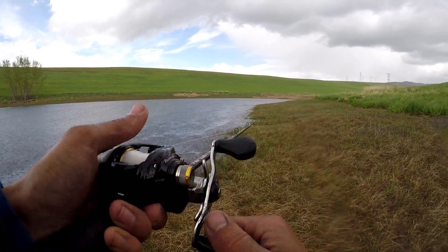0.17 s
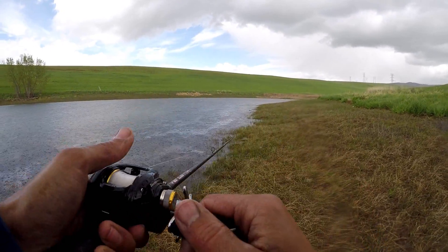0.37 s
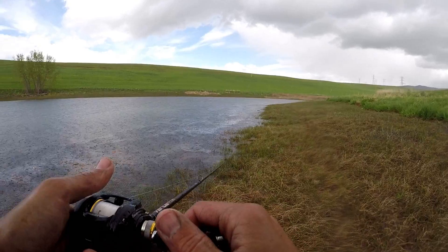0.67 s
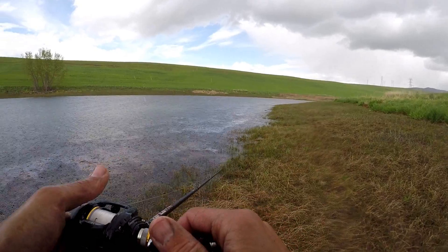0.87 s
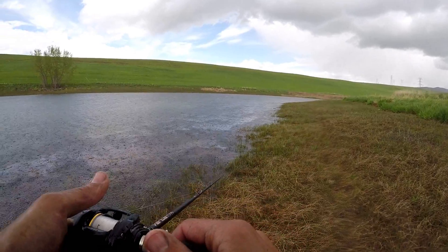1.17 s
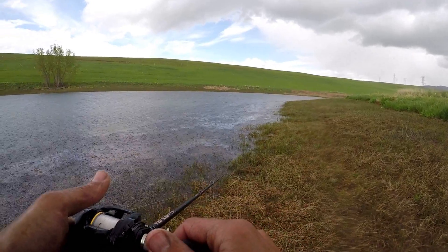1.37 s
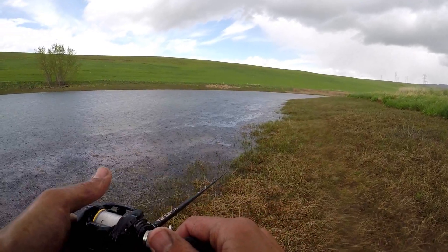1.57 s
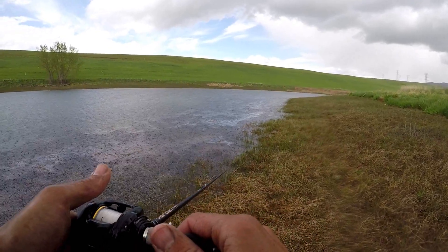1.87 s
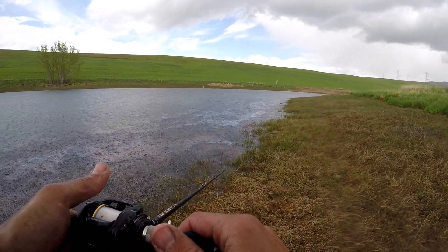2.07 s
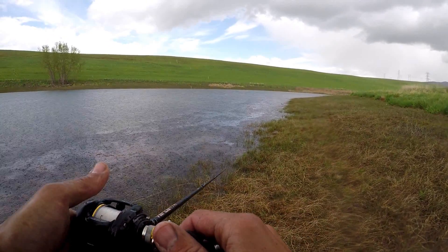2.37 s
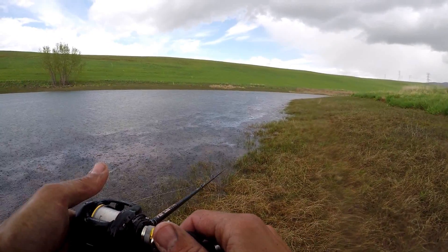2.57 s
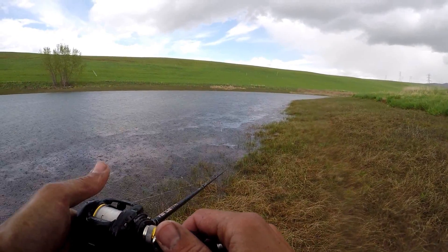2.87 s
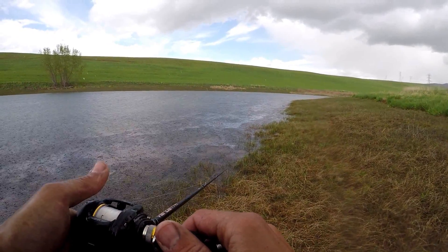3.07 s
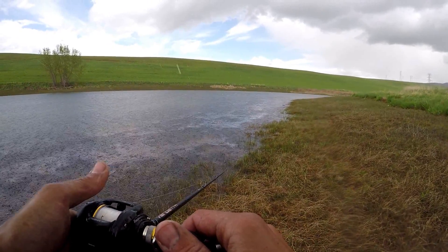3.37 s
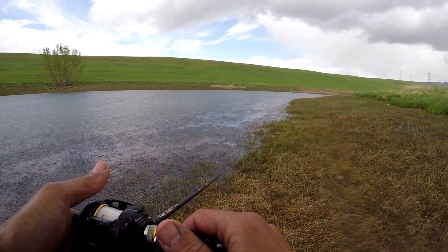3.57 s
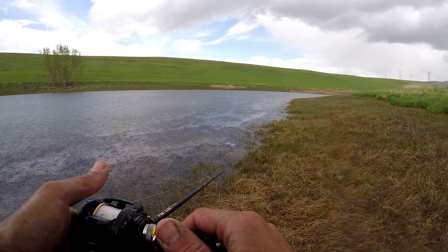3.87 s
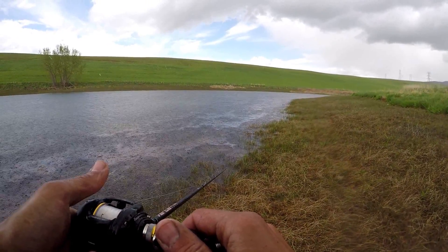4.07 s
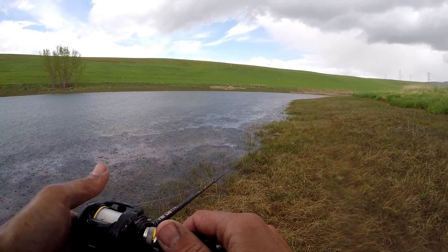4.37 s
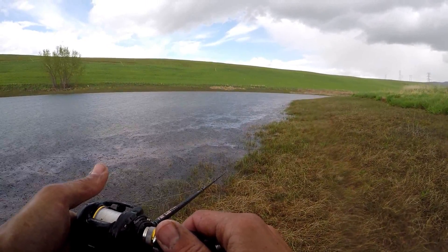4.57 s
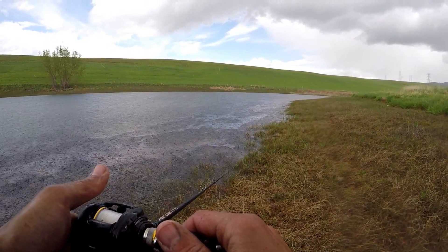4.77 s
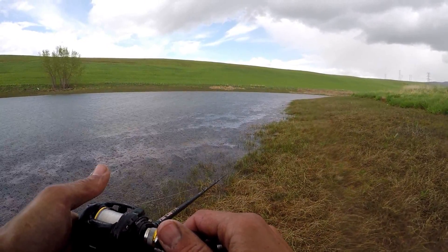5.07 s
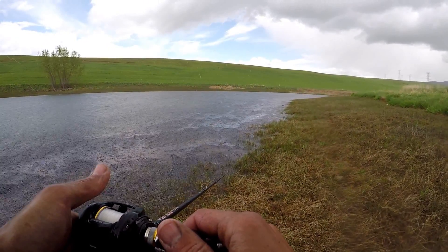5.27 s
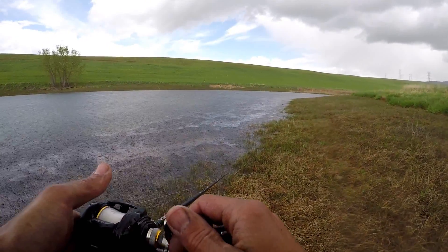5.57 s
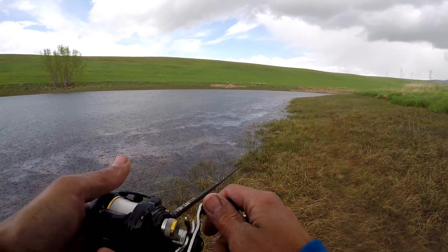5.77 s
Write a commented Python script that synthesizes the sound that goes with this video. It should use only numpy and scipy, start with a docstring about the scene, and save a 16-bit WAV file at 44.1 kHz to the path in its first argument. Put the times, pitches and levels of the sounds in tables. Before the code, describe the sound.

Heavy raindrops pop and patter on a rain jacket beside a pond, with soft rain hiss and low wind rumble thumping the microphone.

```python
"""Heavy rain on a rain jacket

We listen from the chest of an angler in a rain jacket, on the grassy bank of a pond.
Fat and small drops pop on the taut cloth: a short push bends a damped fold and sets off ripples.
A few drops tick on the hard microphone case, and others spatter on grass stalks, as short ringing hits.
Far rain is a hiss of coloured noise; wind is low noise that swells and fades, with dull rounded thumps."""
import sys
import numpy as np
from scipy import signal
from scipy.fft import rfft, irfft
from scipy.io import wavfile
from scipy.ndimage import uniform_filter1d

SR = 44100
rng = np.random.default_rng(int(sys.argv[2]) if len(sys.argv) > 2 else 0)


def output_pcm(signal):
    """Save a mono or channel-first signal as 16-bit PCM at the path in sys.argv[1].

    Samples are clipped to [-1, 1] before scaling.
    """
    pcm = np.clip(np.atleast_2d(signal).T, -1, 1) * 32767
    wavfile.write(sys.argv[1], SR, np.round(pcm).astype(np.int16))


N = 261072
GRAIN = 1024  # samples that one drop lasts


def from_db(db):
    """Turn decibels into a factor to multiply the sound by."""
    return 10 ** (np.asarray(db) / 20)


def rms_one(x):
    """Scale every row to an average strength (rms) of 1."""
    return x / np.sqrt(np.mean(x ** 2, axis=-1, keepdims=True) + 1e-20)


def in_time(rows):
    """Draw straight lines between the rows of a table, giving each column a value at every sample."""
    times, *columns = np.transpose(rows)
    return [np.interp(np.arange(N) / SR, times, column) for column in columns]


def noise(spectrum):
    """Steady noise of a given colour, rms 1, silent outside the frequencies in the table."""
    hz, db = np.transpose(spectrum)
    f = np.maximum(np.fft.rfftfreq(N, 1 / SR), 1e-3)
    gain = from_db(np.interp(np.log(f), np.log(hz), db, left=-np.inf, right=-np.inf))
    white = rfft(rng.standard_normal(N))
    return rms_one(irfft(white * gain, N))


def response(hz, q):
    """Low-pass and band-pass response of a damped mass on a spring; a higher q rings longer."""
    s = 1j * np.fft.rfftfreq(GRAIN, 1 / SR) / hz
    low = 1 / (1 + s / q + s * s)
    band = low * s / q
    return low, band


def splatter(count, decay_s):
    """Spectra of short bursts of noise that die away, each of unit energy."""
    fade = np.exp(-np.arange(GRAIN) / SR / decay_s)
    bursts = rng.standard_normal((count, GRAIN)) * fade
    return rfft(rms_one(bursts)) / np.sqrt(GRAIN)


def place(times, grains):
    """Add every grain to the timeline at its own time."""
    at = np.round(times * SR).astype(int) + np.arange(GRAIN)
    return np.bincount(at.ravel(), grains.ravel(), N)[:N]


def cloth_pops(fold_hz, contact_hz, fold_q, ripple, flap, ripple_s=0.0012, ripple_hz=2300,
               flap_hz=290, spray=0.0033):
    """One pop per drop: a brief push bends a heavily damped fold, then ripples run through the cloth."""
    count = len(fold_hz)
    # each spot of cloth differs
    tension, looseness, panel_size = rng.standard_normal((count, 3)).T[:, :, None]
    push = response(contact_hz, np.sqrt(.5))[0]  # a softer contact is duller

    ripples = splatter(count, ripple_s) * response(ripple_hz, 0.73)[0]
    ripples = ripples * np.sqrt(SR / 4 / ripple_hz)  # make up for the treble filtered out
    ripple_amount = ripple * from_db(8.8 * looseness)
    fold = response(fold_hz, fold_q * from_db(0.4 * tension))[1]
    fold = fold * (1 + ripple_amount * ripples)

    # the whole panel swings low
    panel = flap * response(flap_hz * 2 ** (0.54 * panel_size), 1.36)[1]
    # the bursting drop adds a trace of treble
    droplets = spray * splatter(count, 0.0048)

    # bending waves travel faster the higher they are, so the lows arrive a little late
    s = 1j * np.fft.rfftfreq(GRAIN, 1 / SR) / contact_hz
    late_lows = (1 - s) / (1 + s)
    return rms_one(irfft(push * (fold + panel) * late_lows + droplets))


# The fattest drops on the jacket, levels averaged over one grain, before the colour of the case:
# (time [s], level [dB], pitch of the struck fold [Hz], sharpness of the contact [Hz])
FAT_DROPS = [(0.094, -34, 1080, 1870), (0.241, -41, 2180, 5560), (0.2519, -34.5, 870, 1530),
             (0.2725, -31.5, 920, 2440), (0.414, -40.5, 3040, 3200), (0.432, -27.5, 960, 1500),
             (0.4499, -37, 950, 1200), (0.4592, -33, 754, 1600), (0.4692, -38.5, 784, 1780),
             (0.585, -32.5, 1060, 1610), (0.716, -31.5, 780, 2100), (0.755, -33, 1400, 3300),
             (0.9678, -34, 1670, 1590), (0.9883, -28.5, 1300, 2740), (1.0543, -30.5, 700, 1810),
             (1.1276, -35, 705, 2840), (1.1677, -32, 1700, 2050), (1.2824, -28, 800, 1330),
             (1.2977, -31, 920, 2680), (1.3079, -36, 2100, 2110), (1.3381, -30, 1140, 1230),
             (1.3944, -35.5, 740, 2600), (1.5374, -34.5, 1360, 2100), (1.5949, -33.5, 1010, 2400),
             (1.6234, -29, 1160, 2160), (1.685, -30, 1800, 2430), (1.691, -31.5, 1080, 2910),
             (1.7354, -35.5, 2620, 2600), (1.8037, -32, 940, 1830), (1.835, -30.5, 700, 2580),
             (1.9067, -27.5, 1210, 3530), (2.0456, -35.5, 1390, 4200), (2.0629, -24.5, 1240, 1360),
             (2.0696, -39.5, 1800, 6000), (2.1382, -33.5, 1330, 2440), (2.2414, -29.5, 940, 4170),
             (2.2499, -30.5, 1060, 2920), (2.314, -32.5, 1190, 1770), (2.3639, -31, 1920, 1830),
             (2.4054, -33.5, 790, 1610), (2.417, -33.5, 2010, 3060), (2.5118, -35.5, 1030, 2410),
             (2.5648, -31.5, 790, 2720), (2.598, -29, 1510, 3480), (2.6921, -33, 1630, 2490),
             (2.795, -35, 1410, 2600), (2.8435, -32, 1040, 2360), (2.9167, -34.5, 730, 2900),
             (2.954, -34.5, 785, 3500), (2.9903, -32, 770, 1190), (3.0448, -32, 950, 3100),
             (3.0862, -27, 756, 3800), (3.126, -32, 726, 1800), (3.2295, -31, 890, 3800),
             (3.2422, -31.5, 990, 9000), (3.266, -32, 597, 2400), (3.2925, -31.5, 980, 8000),
             (3.3621, -35, 990, 2400), (3.3815, -33.5, 1010, 2400), (3.399, -27.5, 1560, 1700),
             (3.4363, -33, 950, 3500), (3.4707, -36, 1080, 2100), (3.5219, -30.5, 905, 7100),
             (3.5427, -28.5, 1580, 1800), (3.5609, -30.5, 684, 2030), (3.572, -27, 647, 3100),
             (3.596, -37.5, 2100, 7200), (3.6411, -32.5, 730, 3500), (3.662, -37, 1460, 2900),
             (3.8505, -30, 2080, 1970), (3.8548, -32.5, 1070, 2600), (3.8637, -33.5, 1310, 2600),
             (3.9278, -33.5, 483, 2900), (3.9304, -32.5, 1900, 1800), (3.9744, -31.5, 810, 2880),
             (3.9877, -27.5, 1160, 2860), (4.036, -32.5, 1360, 3500), (4.0785, -30, 1380, 1500),
             (4.1493, -28.5, 1700, 1600), (4.189, -32, 2200, 2100), (4.203, -33, 1390, 2000),
             (4.2377, -24.5, 880, 3100), (4.271, -35.5, 784, 2400), (4.3468, -34, 2540, 2400),
             (4.377, -25.5, 754, 3000), (4.5092, -31, 1410, 8450), (4.7189, -37, 750, 5600),
             (4.8205, -30, 710, 1800), (4.8549, -34, 660, 1700), (4.8969, -28.5, 1210, 2900),
             (4.9187, -34, 1010, 5100), (4.9785, -32.5, 990, 2000), (4.994, -34, 900, 3820),
             (5.062, -34.5, 840, 2100), (5.2059, -34, 1140, 1290), (5.2627, -30, 1660, 1500),
             (5.3158, -31.5, 1720, 1700), (5.3274, -27.5, 770, 2000), (5.339, -30.5, 1160, 1830),
             (5.3509, -33.5, 540, 3500), (5.4716, -34.5, 680, 1780), (5.4798, -36.5, 1010, 5100),
             (5.6634, -30, 736, 2580), (5.68, -27.5, 800, 2580), (5.6936, -34, 950, 2580),
             (5.7014, -30, 900, 1590), (5.763, -31.5, 1250, 2620), (5.8068, -33, 910, 1970),
             (5.8592, -28, 1070, 1680)]


def fat_drops():
    """The loudest single pops, each bending its own fold of cloth at a listed time."""
    times, db, fold_hz, contact_hz = np.array(FAT_DROPS, float).T[:, :, None]
    pops = cloth_pops(fold_hz, contact_hz, fold_q=1.1, ripple=0.38, flap=0.28)
    return place(times, from_db(db) * pops)


def small_drops(patter_db, count=1700, top_db=2.0, range_db=17.0, fold_hz=1130, contact_hz=2600):
    """Smaller drops pop at random all over the jacket, the faint ones most often."""
    times = rng.uniform(0, (N - 1) / SR, (count, 1))
    fainter_db = range_db * rng.random((count, 1)) ** 0.69
    db = patter_db[(times * SR).astype(int)] + top_db - fainter_db
    # spread the pitches in octaves
    folds = fold_hz * 2 ** rng.normal(0, 0.5, (count, 1))
    contacts = contact_hz * 2 ** rng.normal(0, 0.44, (count, 1))
    pops = cloth_pops(folds, contacts, fold_q=2.02, ripple=0.42, flap=0.24)
    return place(times, from_db(db) * pops)


# The sharpest drops on the microphone case, peak levels relative to one another:
# (time [s], level [dB])
CASE_TICKS = [(1.607, -24.5), (1.7384, -25), (1.8357, -25), (2.422, -21.5), (2.694, -30), (2.922, -27),
              (3.0476, -27), (3.086, -24), (3.123, -23.5), (3.153, -24.5), (3.3685, -29.5), (3.389, -24),
              (3.429, -29), (3.631, -23), (3.9755, -26), (4.0532, -19.5), (4.0683, -22.5), (4.2865, -33),
              (4.301, -20.5), (4.356, -30), (4.376, -27), (4.92, -29), (4.9936, -32), (5.43, -31),
              (5.6644, -31), (5.8388, -27)]


def case_ticks(gain_db=4.5, case_hz=2400, case_q=0.87, splash=1.0, splash_s=0.00037, crack=0.042):
    """Hard plastic gives a very short, bright tick with a little splash."""
    times, db = np.array(CASE_TICKS, float).T[:, :, None]
    hit = 1 + splash * splatter(len(times), splash_s)
    body = response(case_hz, case_q)[1]
    bright_edge = crack * response(10000, 3.6)[1]
    ticks = irfft(hit * (body + bright_edge))
    ticks = ticks / np.abs(ticks).max(axis=1, keepdims=True)
    return place(times, from_db(db + gain_db) * ticks)


# How the hollow case colours all near drops, one row per resonance:
# (centre [Hz], width [Hz], lift or cut [dB])
CASE_RESONANCES = [(252, 60, 2), (810, 250, 2), (1400, 1470, -2), (1980, 500, 1.5), (3450, 3500, -1)]


def case_colour(x):
    """Each resonance of the hollow case lifts or lowers its own band."""
    for hz, width_hz, db in CASE_RESONANCES:
        b, a = signal.iirpeak(hz, hz / width_hz, fs=SR)
        x = x + (from_db(db) - 1) * signal.lfilter(b, a, x)
    return x


def grass_ticks(patter_db, count=500, top_db=-4.5, range_db=39.5, blade_hz=3900, blade_q=2.6, wet=0.88):
    """Drops on the stalks underfoot give a thin, crisp spatter: high, damped rings with a wet burst."""
    times = rng.uniform(0, (N - 1) / SR, (count, 1))
    fainter_db = range_db * rng.random((count, 1)) ** .5
    db = patter_db[(times * SR).astype(int)] + top_db - fainter_db
    blades = blade_hz * 2 ** rng.normal(0, 0.4, (count, 1))
    ring = response(blades, blade_q)[1]
    softened = ring * response(9900, np.sqrt(.5))[0]
    ticks = softened * (1 + wet * splatter(count, 0.0015))
    return place(times, from_db(db) * rms_one(irfft(ticks)))


# Colour of the far rain, only the shape matters:
# (frequency [Hz], relative level [dB per Hz])
POND_COLOUR = [(100, 17.5), (200, 4), (400, 7.5), (800, 2.5), (1800, -3), (3000, -8.5), (5000, -12.5),
               (7300, -12), (9500, -21), (14500, -21), (16000, -29)]


def pond(hiss_db, gain_db=10.5):
    """Countless far drops on water and grass merge into a smooth wash of noise."""
    return from_db(hiss_db + gain_db) * noise(POND_COLOUR)


def eddies(spectrum, steady_s):
    """Turbulent pressure whose strength is evened out over steady_s, so that the gusts set its level."""
    x = noise(spectrum)
    power = uniform_filter1d(x * x, max(int(steady_s * SR), 1))
    return x / np.sqrt(power + 0.13)  # 0.13 keeps quiet moments from being raised too far


# Strength of the wind on the microphone, before the gains in wind():
# (time [s], slow sway level [dB], buffeting level [dB])
WIND_LEVELS = [(0.0, -32, -50), (0.55, -31, -52), (1.04, -24.5, -36), (1.25, -26, -43), (1.65, -20, -37.5),
               (1.95, -22.5, -38.5), (2.39, -15.5, -32.5), (2.56, -20, -39.5), (3.15, -21.5, -37),
               (3.5, -17.5, -35), (3.92, -24.5, -43), (4.24, -21.5, -38), (4.71, -16, -35.5),
               (4.9, -23, -36.5), (5.17, -16.5, -35), (5.42, -22, -37.5), (5.6, -16.5, -35.5),
               (5.92, -24.5, -50)]
# Colour of the slow sway, only the shape matters: (frequency [Hz], relative level [dB per Hz])
SWAY_COLOUR = [(2, 1.5), (5, 5.5), (10, 3), (18, -2.5), (30, -13.5), (42, -14), (70, -39)]
# Colour of the buffeting, only the shape matters: (frequency [Hz], relative level [dB per Hz])
BUFFET_COLOUR = [(25, -2), (45, -7.5), (65, -3), (95, -7.5), (140, -16), (220, -19.5), (450, -41.5)]


def wind(sway_gain_db=5.5, buffet_gain_db=-1.0):
    """Large eddies sway the pressure slowly; small ones buffet the microphone port in gusts."""
    sway_db, buffet_db = in_time(WIND_LEVELS)
    sway = from_db(sway_db + sway_gain_db) * eddies(SWAY_COLOUR, 0.23)
    buffeting = from_db(buffet_db + buffet_gain_db) * eddies(BUFFET_COLOUR, 0.061)
    return sway + buffeting


# Dull bumps as gusts and cloth knock the microphone:
# (time [s], peak level [dB], pitch [Hz])
BUMPS = [(0.381, -23.5, 43.5), (0.585, -24, 209), (0.65, -24, 54), (0.887, -27.5, 111), (1.07, -27, 60),
         (1.259, -26, 102), (1.626, -31.5, 207), (2.163, -21.5, 63.7), (2.277, -19.5, 62),
         (2.332, -19.5, 80), (2.388, -18, 71.4), (3.063, -23, 61), (3.375, -24.5, 229), (3.408, -23, 95),
         (4.036, -24.5, 247), (4.727, -23.5, 69), (5.161, -14.5, 61.6), (5.259, -13.5, 68.4),
         (5.527, -18.5, 48), (5.663, -22.5, 268), (5.696, -20.5, 55)]


def thumps(q=1.46, top_ratio=1.32):
    """Each bump is a soft, rounded push on the case that swings and quickly dies away."""
    out = np.zeros(N)
    size = SR // 8  # samples that one bump lasts
    for time, db, hz in BUMPS:
        rounding = signal.butter(3, top_ratio * hz, fs=SR, output="sos")
        push = signal.sosfilt(rounding, signal.unit_impulse(size))
        b, a = signal.iirpeak(hz, q, fs=SR)
        bump = signal.lfilter(b, a, push)
        bump = from_db(db) * bump / np.abs(bump).max()
        at = int(time * SR)
        out[at:at + size] += bump[:N - at]
    return out


# Strength of the shower, before each layer adds its own gain; the patter also guides the grass:
# (time [s], near patter level [dB], far hiss level [dB])
SHOWER_LEVELS = [(0.0, -46, -58), (0.5, -44.5, -59.5), (0.95, -38.5, -56), (1.2, -39, -56),
                 (1.53, -43.5, -57.5), (2.04, -36.5, -56.5), (2.44, -39.5, -55), (2.69, -40, -56.5),
                 (3.4, -36, -52.5), (3.75, -37, -55), (4.25, -37.5, -54), (4.65, -39, -56),
                 (5.13, -38.5, -53.5), (5.5, -39.5, -54.5), (5.92, -37.5, -52.5)]


def scene():
    """Add near drops, grass, far rain and wind together at one microphone."""
    patter_db, hiss_db = in_time(SHOWER_LEVELS)
    near = case_colour(fat_drops() + small_drops(patter_db) + case_ticks())
    around = grass_ticks(patter_db) + pond(hiss_db)
    return (near + around + wind() + thumps())[None]


def record(dry, cutoff_hz=15500):
    """Cut the highest treble steeply, with a filter that has had a short lead-in to settle."""
    top_cut = signal.ellip(10, .1, 90, cutoff_hz, fs=SR, output="sos")
    with_lead_in = np.pad(dry, ((0, 0), (GRAIN, 0)), mode="edge")
    return signal.sosfilt(top_cut, with_lead_in)[:, GRAIN:]


dry = scene()
out = record(dry)
output_pcm(out)
```